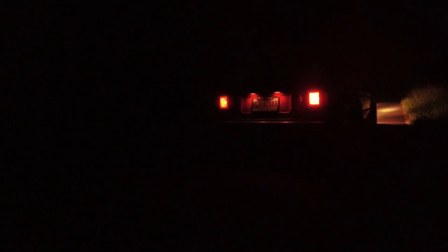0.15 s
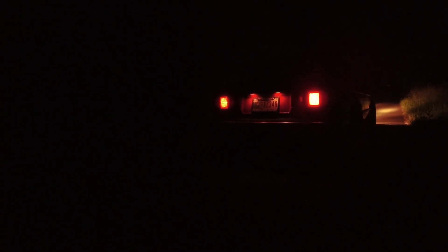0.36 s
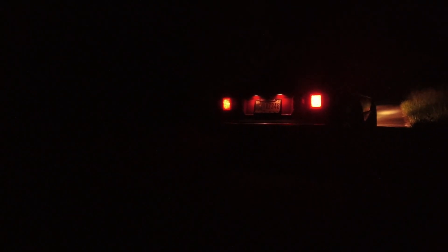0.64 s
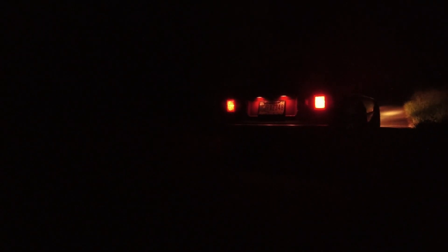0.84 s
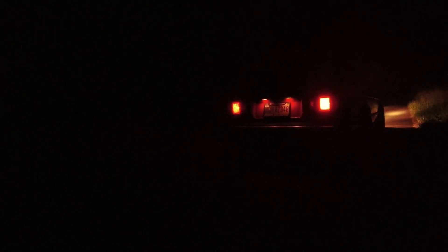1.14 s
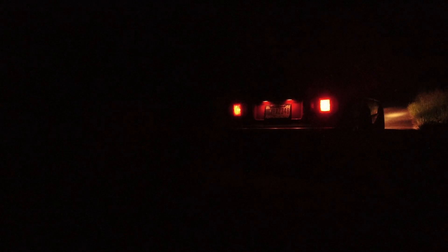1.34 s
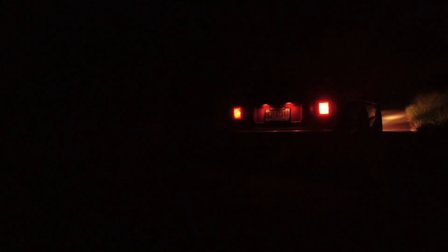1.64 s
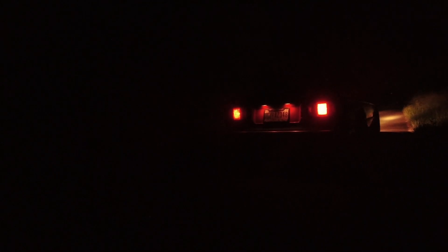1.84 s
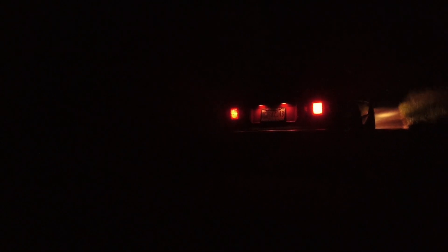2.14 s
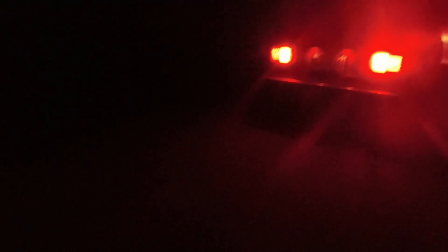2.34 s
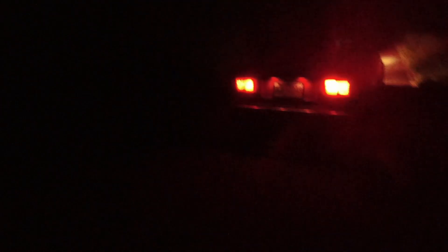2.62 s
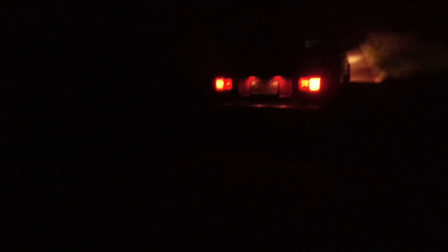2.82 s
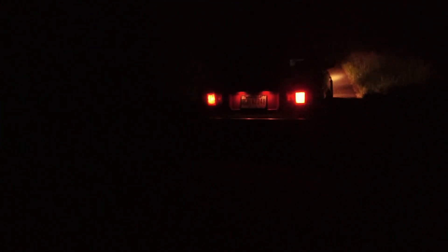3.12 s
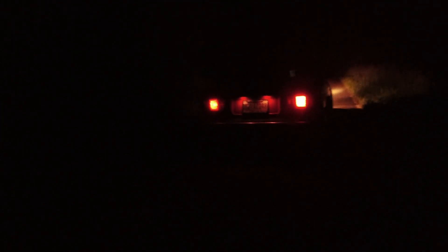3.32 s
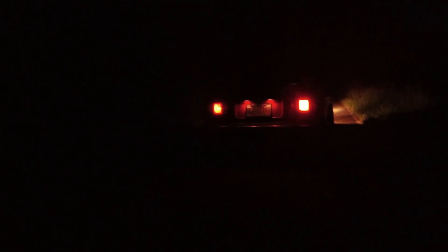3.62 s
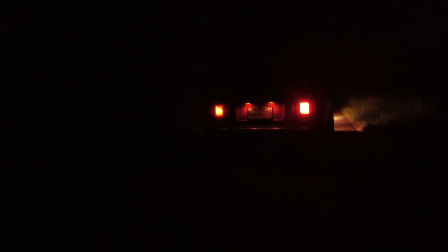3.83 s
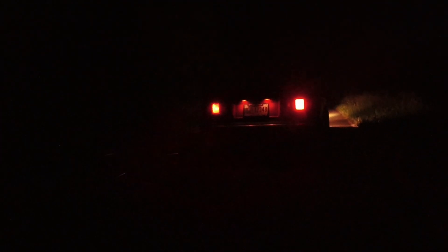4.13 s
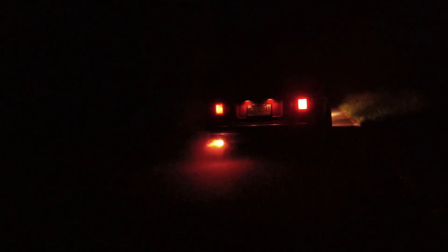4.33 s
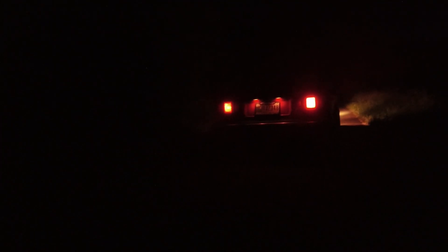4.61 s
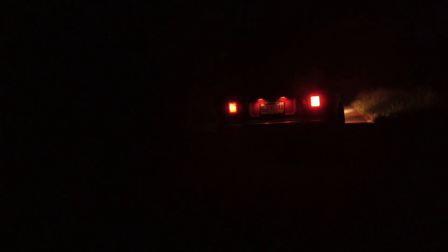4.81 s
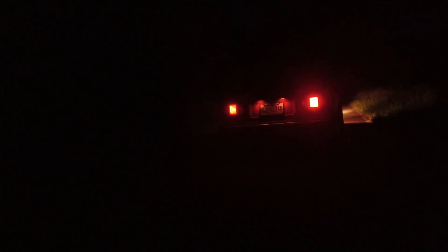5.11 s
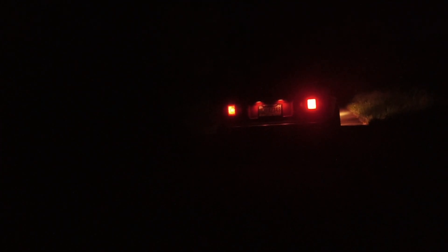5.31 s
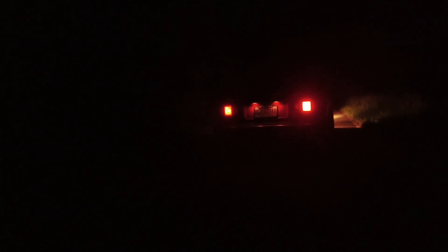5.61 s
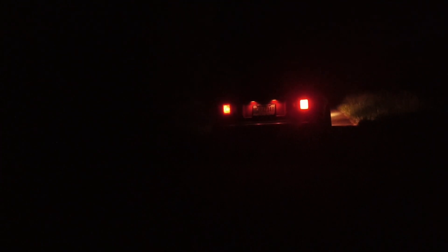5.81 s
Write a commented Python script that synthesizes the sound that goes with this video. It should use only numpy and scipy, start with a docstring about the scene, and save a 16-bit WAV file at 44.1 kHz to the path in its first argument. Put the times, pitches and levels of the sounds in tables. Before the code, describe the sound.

A turbocharged four-cylinder car is heard from close behind on a quiet night road. It begins at full throttle and hits its limiter at about 0.13 s: the steady note breaks into hissing gas, irregular hollow thuds, dry snaps and soft flame whumps, strongest around 0.65, 0.8 and 0.95 s. A breathy high turbo whistle creeps in. At 1.55 s the engine catches, a faint two-note chirp escapes, and the raspy drone falls with the whistle. At 2.34 s the sound cuts abruptly to a low, lumpy, much quieter idle. From 3.07 s the throttle opens and revs sweep up, growling, to the limiter at 3.9 s. Choppy pops and cracks follow, then from 4.5 to 5.3 s a dense, swelling machine-gun barrage of roaring bangs. A clearer chirp at 5.35 s releases boost; revs and whistle slide down until 5.96 s. Bass-heavy stereo microphones flatten the peaks; faint roadside reflections.

```python
"""Turbocharged car on its launch limiter

A four-cylinder car stands on a quiet road at night and is twice held against its limiter. Firing pulses excite
the exhaust resonances as boom, rasp and hiss; with the spark cut, lone firings thud and unburnt fuel explodes,
snaps and flares. Between the bouts the engine coasts, idles and revs up; a gliding tone is the turbo's whistle,
and two-note chirps are escaping boost. The microphones behind the car flatten the loudest peaks."""
import sys
import numpy as np
from scipy import signal
from scipy.fft import rfft, irfft, next_fast_len
from scipy.io import wavfile
from scipy.ndimage import uniform_filter1d

SR = 44100
rng = np.random.default_rng(int(sys.argv[2]) if len(sys.argv) > 2 else 0)


def transcribe(signal):
    """Save signal, clipped to [-1, 1], as a 16-bit WAV file at the path in sys.argv[1]."""
    frames = np.atleast_2d(signal).T
    limited = np.clip(frames, -1, 1)
    pcm = np.round(limited * 32767).astype(np.int16)
    wavfile.write(sys.argv[1], SR, pcm)


N = 262684
TIME = np.arange(N) / SR
FFT_SIZE = next_fast_len(N + SR // 2, True)
FREQ = np.fft.rfftfreq(FFT_SIZE, 1 / SR) + 1e-3  # kept above zero for the logarithms
TOP_HZ = 16000  # upper limit of the sound
LIMIT_HZ = 198.84  # firing rate at which the limiter cuts the spark

# Engine speed; the sound cuts abruptly from coasting to idle at 2.34 s: [t/s, firing rate f/Hz]
SPEED = [(0, 166), (.09, 188), (.125, 196), (1.53, 200), (1.6, 211), (1.7, 206), (2.335, 156),
         (2.342, 36.07), (3.05, 37.34), (3.165, 45), (3.385, 64.3), (3.468, 81.6), (3.58, 106.2),
         (3.794, 166.5), (3.9, 196), (4.48, 200), (5.41, 208), (5.96, 164)]
# Strength of each cylinder in firing order, before the inequality factor: [level/dB]
CYLINDER_DB = [2.5, -0.5, -1, 0.5]
# Spectrum of the silencer's boom: [f/Hz, level/dB per Hz]
BOOM = [(25, -16), (50, -6.5), (80, 8), (125, 14.5), (170, 10.5), (215, 2.5), (270, -7), (450, -49)]
# Spectrum of the rasp while the revs climb: [f/Hz, level/dB per Hz]
RASP_LOADED = [(280, -11), (375, 3.5), (460, -8), (560, 3), (700, -14), (850, -4), (1050, -14.5),
               (1250, -25), (1750, -12.5), (2000, -19), (2270, -13.5), (2700, -44), (3600, -28.5)]
# Spectrum of the rasp otherwise: [f/Hz, level/dB per Hz]
RASP_COASTING = [(265, 8), (400, 1.5), (480, 5), (560, 1.5), (680, 3.5), (770, -7), (870, -0.5),
                 (1100, -15.5), (1280, -17), (1450, -16), (1720, -28.5), (2050, -16.5), (2500, -46.5)]
# Spectrum of the hissing exhaust gas: [f/Hz, level/dB per Hz]
GAS = [(2200, -1.5), (3200, -6), (4100, 0), (5000, -7), (6000, -3), (8000, -6.5), (10300, -9),
       (12500, -15.5), (16000, -13)]


def engine(pulse_top_hz=600, idle_top_hz=380, jitter_s=.0001, uneven_db=2.4, hiss_flutter=0.3,
           idle_hz=125, idle_width_hz=45, load_flutter=.7, turbulence=3.23):
    """Pulse excitation: each firing booms through the silencer, rasps in the pipe and puffs out gas."""
    hz, = curves(SPEED)
    boom_db, rasp_db, hiss_db, inequality, roughness = effort(hz)
    cycles = np.cumsum(hz) / SR
    k = np.arange(int(cycles[-1]) + 1)
    chance = rng.standard_normal((len(k), 2)) * np.interp(k, cycles, roughness)[:, None]
    times = np.interp(k, cycles, TIME) + jitter_s * chance[:, 0]
    lumpy = np.interp(times, TIME, inequality)
    sizes = undb(lumpy * np.resize(CYLINDER_DB, len(k)) + uneven_db * chance[:, 1])
    # faster firings are smaller
    train = pulses(times, sizes / np.sqrt(np.interp(times, TIME, hz)))

    boom = filtered(train, colour(BOOM))
    # with little gas flowing, the silencer rings on from one firing to the next
    idling = np.interp(hz, [40, 65], [1, 0])
    ring = filtered(boom, 1 / (1 + 1j * (FREQ ** 2 - idle_hz ** 2) / (FREQ * idle_width_hz)))
    boom = steady(idling * ring + (1 - idling) * boom)

    # the throttle is open while the revs climb
    climbing = np.gradient(hz) * SR > 20
    load = np.clip(uniform_filter1d(climbing, SR // 20, output=float), 0, 1)
    # the rasp is pulse, repeating clatter and turbulence; load brings out the pulse
    puff = np.exp(-(cycles % 1) / .5) * sizes[cycles.astype(int)] ** 2
    pulse = in_pipe(filtered(train, lowpass(pulse_top_hz)))
    rattle = in_pipe(np.sqrt(puff) * clatter(cycles))
    pulse_share = .25 + .5 * load
    rough = 2 * (pulse_share * pulse + (1 - pulse_share) * rattle)
    rough = rough + turbulence * roughness * in_pipe(puff * noise())
    rasp = load * filtered(rough, colour(RASP_LOADED)) + (1 - load) * filtered(rough, colour(RASP_COASTING))
    # slow gas makes a duller rasp
    slow = np.interp(hz, [40, 130], [.8, 0])
    rasp = steady((1 - slow) * rasp + slow * filtered(rasp, np.abs(lowpass(idle_top_hz))))

    flow = 1 + (hiss_flutter + load_flutter * load) * puff
    hiss = steady(filtered(flow * noise(), colour(GAS)))
    # misfiring makes the gas crackle
    hiss = hiss * undb(2 * roughness * (waver(hz=250) - .25))
    return undb(boom_db) * boom + undb(rasp_db) * rasp + undb(hiss_db) * hiss + growl(hz, load, puff)


# How the engine sounds in each state, levels at the limiter's speed: state: [boom level/dB, rasp level/dB,
# hiss level/dB, rasp slope/dB per octave of speed, hiss slope/dB per octave, cylinder inequality factor]
STATES = { "full throttle": (-3.5, -9, -37, 14.5, 6, 0.7),
          "first misfires": (-9.5, -9.5, -39.5, 11.5, 3, 2.9),
          "limiter bites": (-23, -21.5, -34.5, 16.5, -5, 2), "spark cut": (-18, -21.5, -26.5, 17, 3.5, 2),
          "catching": (-4, -9, -26.5, 15.5, 7, 0.2), "barrage": (-18.5, -10, -24.5, 22, 9.5, 1.3),
          "hot barrage": (-16.5, -9, -17.5, 15.5, -3.5, 2), "throttle shut": (-22, -22, -33.5, 17, 23, 2),
          "coasting": (-10.5, -18.5, -34.5, 13, 29, 1.19), "idle": (-16.5, -19, -44, 15.5, 20, 1),
          "throttle cracks open": (-12, 0.5, -35.5, 18, 7, 2),
          "light throttle": (-10, -13, -49, 15, 4.5, 2.1), }
# What the driver and the limiter do: [from t/s, state]
DRIVE = [(0, "full throttle"), (0.126, "limiter bites"), (.19, "spark cut"), (1.546, "catching"),
         (1.597, "throttle shut"), (1.626, "coasting"), (2.336, "idle"), (3.07, "throttle cracks open"),
         (3.1, "light throttle"), (3.345, "throttle shut"), (3.379, "full throttle"),
         (3.906, "first misfires"), (3.942, "limiter bites"), (3.973, "spark cut"), (4.499, "barrage"),
         (4.912, "hot barrage"), (5.375, "throttle shut"), (5.405, "coasting")]
CLEAN_STATES = ("full throttle", "coasting", "light throttle")
CLEAN_ROUGHNESS = .35  # share of the roughness left in the clean-sounding states
BOOM_DB_PER_OCTAVE = 4.5  # growth with engine speed
CHANGE_S = 0.016  # one state blends into the next


def effort(hz):
    """Power law of speed: the state sets boom, rasp and hiss in dB, inequality and roughness."""
    starts = [s for s, _ in DRIVE]
    now = np.maximum(np.searchsorted(starts, TIME, side="right") - 1, 0)
    settings = np.array([STATES[state] for _, state in DRIVE])
    boom, rasp, hiss, rasp_slope, hiss_slope, lumpy = settings[now].T
    roughness = np.array([CLEAN_ROUGHNESS if state in CLEAN_STATES else 1 for _, state in DRIVE])[now]
    octaves = np.log2(hz / LIMIT_HZ)
    boom = boom + BOOM_DB_PER_OCTAVE * octaves
    rasp = rasp + rasp_slope * octaves
    hiss = hiss + hiss_slope * octaves
    controls = np.array([boom, rasp, hiss, lumpy, roughness])
    return uniform_filter1d(controls, int(CHANGE_S * SR) + 1)


def in_pipe(x):
    """Low-pass transmission: the pipe dulls a sound above 2 kHz, here held at unit level."""
    return steady(filtered(x, lowpass(2000)))


def clatter(cycles):
    """Periodicity: a random-phase pattern of gas flow that comes round again every four firings."""
    orders = np.exp(2j * np.pi * rng.random(200))
    pattern = irfft(np.append(0, orders), 8192)
    places = np.arange(len(pattern)) / len(pattern)
    return steady(np.interp(cycles / len(CYLINDER_DB), places, pattern, period=1))


# Upper resonances of the pipe that growl under load: [f/Hz, width f/Hz, level/dB]
GROWL = [(1770, 260, -5), (2210, 130, 1)]
GROWL_DB, GROWL_DB_PER_OCTAVE = -23.5, 18  # at the limiter's speed; growth with speed


def growl(hz, load, puff):
    """Resonance under modulated noise: gas under load rings the upper modes in time with the firings."""
    ring = steady(filtered(puff ** 2 * noise(), resonances(GROWL) * lowpass(2400) ** 2))
    level = undb(GROWL_DB + GROWL_DB_PER_OCTAVE * np.log2(hz / LIMIT_HZ))
    return load * level * np.interp(hz, [60, 72], [0, 1]) * ring


# Exhaust pipe resonances: [f/Hz, width f/Hz, level/dB]
PIPE = [(85.7, 27, -1), (145.4, 58.3, 5.5), (246.7, 22, -3.5), (497, 130, -8), (649.4, 50, -6.5),
        (854, 160, -28.5), (1240, 77, -14.5), (2060, 76, -34.5), (2820, 260, -31.5)]
# The loudest explosions of fuel in the pipe, relative levels: [t/s, thud level/dB, roar level/dB]
EXPLOSIONS = [(.677, 4.5, 7.5), (.749, 9.5, 11.5), (.786, 15.5, 3), (3.971, 2, 12), (4.075, -0.5, 14.5),
              (4.502, 1, -2.5), (4.55, 7.5, 4.5), (4.595, 7.5, -0.5), (4.613, 7, -8), (4.665, 5, -5.5),
              (4.678, 3, -3.5), (4.715, 9, 1.5), (4.749, 6, 2.5), (4.801, 8, -1), (4.837, 6, 4.5),
              (4.872, 3, -3), (4.917, 7.5, 11), (4.946, 5, -7), (4.975, 4, 1.5), (5.038, 5.5, -2),
              (5.063, 3, 6), (5.111, 3.5, -1.5), (5.144, 3, -7), (5.181, 8, 6), (5.203, 9.5, 0),
              (5.265, 9.5, -5), (5.283, 6, -7.5), (5.32, 3, -3.5)]
# Spectrum of the burning fuel's roar: [f/Hz, level/dB per Hz]
ROAR = [(70, -6.5), (150, 9), (330, -4.5), (500, 5.5), (700, -4.5), (850, -3), (1400, -16), (2100, -10),
        (3000, -20), (4400, -23), (8000, -35.5), (16000, -39.5)]


def bangs(thud_db=6, roar_db=-1, bark_db=-11, roar_s=0.011, heave_hz=135, heave_width_hz=45, heave_db=3,
          bark_s=0.0077, bark_top_hz=3600, blast_front_hz=1500):
    """Impulse response: firings and explosions ring the pipe; a firing barks briefly, an explosion roars."""
    explosions = list(EXPLOSIONS) + barrage()
    firings, blasts = blows(stutters()), blows(explosions)
    # an explosion pushes for longer than a firing does
    blasts = filtered(blasts, lowpass(blast_front_hz))
    thuds = undb(thud_db) * filtered(firings + blasts, resonances(PIPE))
    # an explosion also heaves the whole column of gas
    thuds = thuds + undb(heave_db) * filtered(blasts, resonances([(heave_hz, heave_width_hz, 0)]))
    # the pressure front is rounded on its way down the pipe
    thuds = signal.sosfilt(signal.butter(4, 3000, fs=SR, output="sos"), thuds)

    # fuel burns in ragged pockets
    pockets = undb(3.5 * waver(hz=220))
    burn = pockets * filtered(noise(apart_hz=3400), colour(ROAR))
    roars = dying(blows([(s, db) for s, _, db in explosions]), roar_s) * ragged(burn)
    barks = filtered(dying(firings, bark_s) * burn, lowpass(bark_top_hz))
    return thuds + undb(roar_db) * roars + undb(bark_db) * barks


# Which firings catch in a stutter, counted from its first: pattern: [firing number]
PATTERNS = {"one": [0], "quick two": [0, 3], "slow two": [0, 7], "quick-slow": [0, 3, 7], "slow-quick": [0,
            7, 10]}
# Stutters of firings that the limiter lets through, relative levels: [t/s, level/dB, pattern]
STUTTER_ROWS = [(0.1339, -0.5, "one"), (.171, 7.5, "one"), (.242, 2.5, "quick two"), (0.293, 8, "one"),
                (.381, 4, "slow-quick"), (.504, 6.5, "quick-slow"), (.627, 6.5, "one"),
                (.712, 8.5, "quick two"), (0.835, 3.5, "quick two"), (0.885, 12.5, "one"),
                (1.009, 9, "quick-slow"), (1.095, 8, "slow-quick"), (1.217, 6, "quick-slow"),
                (1.3136, 10.5, "slow two"), (1.399, 6.5, "slow two"), (1.486, 7, "slow-quick"),
                (3.916, -2.5, "one"), (3.934, 2.5, "one"), (4.004, -2.5, "quick two"), (4.059, 4, "one"),
                (4.13, 0.5, "quick two"), (4.18, 13, "one"), (4.267, 10.5, "slow two"),
                (4.389, 7, "quick two"), (4.441, -2, "slow two"), (4.486, -0.5, "one")]


def stutters():
    """Intermittent excitation: rows (s, dB) of the firings that the limiter lets through."""
    return [(s + slot / LIMIT_HZ, db) for s, db, pattern in STUTTER_ROWS for slot in PATTERNS[pattern]]


BARRAGE_S = (4.51, 5.335)  # with the pipe hot, lesser bangs run together from, to
BARRAGE_GAP = (3, 7)  # fewest and most firings from one bang to the next
# relative level of the thuds at the start, their growth and spread; roar relative to thud
BARRAGE_DB, BARRAGE_SWELL_DB_PER_S, BARRAGE_SCATTER_DB, BARRAGE_ROAR_DB = -0.5, 4, 1.5, -12


def barrage():
    """Random point process: rows (s, thud dB, roar dB) of bangs growing as the pipe heats."""
    start, end = BARRAGE_S
    gaps = rng.integers(BARRAGE_GAP[0], BARRAGE_GAP[1] + 1, size=100)
    age = np.cumsum(gaps) / LIMIT_HZ
    spread = BARRAGE_SCATTER_DB * rng.standard_normal(len(age))
    thud_db = BARRAGE_DB + BARRAGE_SWELL_DB_PER_S * age + spread
    return [(start + a, db, db + BARRAGE_ROAR_DB) for a, db in zip(age, thud_db) if start + a < end]


# Centres of the parts of the roar that swell on their own: [f/Hz]
ROAR_BANDS_HZ = [480, 850, 1400, 2250, 4300]


def ragged(x, spread_db=4, rate_hz=35):
    """Independent band modulation: each band swells and fades alone, so bursts differ in colour."""
    bands = (filtered(x, 1 / (1 + 2j * (FREQ / hz - hz / FREQ))) for hz in ROAR_BANDS_HZ)
    return x + sum((undb(spread_db * waver(hz=rate_hz)) - 1) * band for band in bands)


# Short bright flashes at the tailpipe, relative levels: [t/s, level/dB, length t/s]
FLARES = [(.181, -15, 0.015), (3.971, -4, 0.012), (4.074, -12, 0.011)]
# Spectrum of a jet of flame: [f/Hz, level/dB per Hz]
FLAME = [(500, 0.5), (1500, -3), (3000, -3.5), (4500, -1.5), (7000, -8.5), (10000, -7), (16000, -15.5)]
# Backfires, relative levels: [snap t/s, snap level/dB, whump level/dB, flame level/dB]
BACKFIRES = [(0.186, -12, -10.5, -31), (0.3082, -10, -4, -27), (0.4316, -13.5, 0.5, -25.5),
             (0.5552, -5.5, -6, -17), (0.6268, -9, 5, -6.5), (.921, -1.5, 8, -6), (4.196, -8.5, -11, -23.5),
             (4.318, -11.5, -4, -22.5), (4.441, -19, -7.5, -30)]
IGNITION_S, JET_S = .0285, 0.036  # from snap to whump; length setting of the jet


def flames(whump_hz=38, whump_width_hz=55, soft_hz=260, snap_hz=2000, snap_width_hz=3200,
           whump_db=1, snap_db=11.0):
    """Combustion noise: fuel lights at the tailpipe with a dry snap, a pressure whump and a hissing jet."""
    jets = list(FLARES) + [(s + IGNITION_S, db, JET_S) for s, _, _, db in BACKFIRES]
    jet = sum(undb(db) * swell(s, length) for s, db, length in jets)
    pushes = blows([(s + IGNITION_S, db) for s, _, db, _ in BACKFIRES])
    heave = resonances([(whump_hz, whump_width_hz, 0)])
    whumps = filtered(pushes, heave / (1 + 1j * FREQ / soft_hz) ** 2)
    # a snap is over within a few milliseconds
    spark = dying(blows(BACKFIRES), .0016) * noise(apart_hz=3000)
    mouth = resonances([(snap_hz, snap_width_hz, 0)])
    snaps = filtered(spark, mouth / np.abs(mouth).max())
    return jet * filtered(noise(), colour(FLAME)) + undb(whump_db) * whumps + undb(snap_db) * snaps


def hush(depth_db=-4):
    """Gain modulation: the engine's level dips between each snap and its whump."""
    stalled = sum((TIME > s) * (TIME < s + IGNITION_S) for s, *_ in BACKFIRES)
    return undb(depth_db * uniform_filter1d(1. * stalled, size=SR // 100))


# Boost escaping as the throttle shuts, relative levels:
# [t/s, lower note f/Hz at the start, upper note f/Hz at the start, level/dB, length t/s]
CHIRPS = [(1.553, 646, 835, -16.5, 0.035), (5.346, 1396, 2120, -9, .022), (5.419, 1138, 1570, -22, .04)]


def chirps(upper_db=-3, sag_per_s=.8):
    """Flow-excited tones: the blow-off valve squeals two notes, sagging as the pressure drops."""
    out = 0
    for s, lower, upper, db, length in CHIRPS:
        sag = np.exp(-sag_per_s * np.maximum(TIME - s, 0))
        turns = 2 * np.pi * np.cumsum(sag * (1 + .035 * waver(hz=300))) / SR
        notes = np.sin(lower * turns) + undb(upper_db) * np.sin(upper * turns)
        out = out + undb(db) * swell(s, length) * notes
    return out


# The turbo's whistle, one curve each for the first bout, idle and the second bout: [t/s, f/Hz, level/dB]
TURBO = [
    [(.6, 9000, -61), (.85, 9750, -38.5), (1.1, 9620, -38.5), (1.5, 9170, -38), (1.68, 9300, -41),
     (1.9, 8000, -42), (2.12, 7050, -36.5), (2.335, 6500, -52)],
    [(2.34, 1215, -55), (2.65, 1213, -62), (3.05, 1250, -51.5), (3.12, 1380, -68), (3.2, 1620, -62.5),
     (3.3, 2000, -63), (3.38, 2050, -62)],
    [(4.8, 10260, -51.5), (5.35, 11300, -41), (5.52, 10550, -40.5), (5.75, 9000, -43.5),
     (5.96, 7750, -43.5)],
]


def turbo(flutter_db=5.5, throb_db=3.5, octave_db=-22):
    """Rotor tone: the compressor wheel whistles, throbbing with the exhaust pulses that drive it."""
    hz, db = curves([row for whistle in TURBO for row in whistle])
    heard = sum((TIME >= whistle[0][0]) * (TIME < whistle[-1][0]) for whistle in TURBO)
    fade = uniform_filter1d(np.minimum(heard, 1.), size=SR // 100)
    # one throb per turn of the crank, which is two firings
    throb = np.sin(np.pi * np.cumsum(curves(SPEED)[0]) / SR)
    # the faster the wheel, the breathier its note
    speed = hz / hz.max()
    wander = .026 * np.maximum(speed, .25) ** 2
    phase = 2 * np.pi * np.cumsum(hz * (1 + wander * waver(hz=298))) / SR
    tone = np.sin(phase) + undb(octave_db) * (2 * hz < TOP_HZ) * np.sin(2 * phase)
    level = undb(db + throb_db * throb + flutter_db * speed * waver(hz=45))
    note = np.sqrt(2) * fade * level * tone
    # it reaches the back of the car partly by way of the road and the underbody
    return scatter(note, decay_s=.015, db=-3)


def roadside(car):
    """Diffuse reflection: the car's sound with faint returns from the roadside."""
    return scatter(car, decay_s=0.15, db=-24.5, apart_hz=200)


# Spectrum of the night air: [f/Hz, level/dB per Hz]
NIGHT = [(25, -68.5), (400, -95), (1200, -89.5), (16000, -124)]


def night_air():
    """Stationary noise: the still night air as a faint coloured hush."""
    return undb(-57.5) * filtered(noise(), colour(NIGHT))


def undb(db):
    """Level law: decibels to amplitude gain."""
    return 10 ** (np.asarray(db) / 20)


def curves(rows):
    """Linear interpolation: each column of a table, joined by straight lines in time."""
    s, *columns = np.transpose(sorted(map(tuple, rows)))
    return [np.interp(TIME, s, c) for c in columns]


def filtered(x, response):
    """Convolution theorem: a spectrum multiplied by a frequency response."""
    return irfft(rfft(x, FFT_SIZE) * response, FFT_SIZE)[..., :N]


def colour(points):
    """Minimum phase: the causal response of (Hz, dB) points, with unit power gain."""
    hz, db = np.transpose(points)
    # roll off outside the points
    below = np.clip(FREQ / hz[0], 1e-2, 1) ** 2
    above = np.minimum(hz[-1] / FREQ, 1) ** 4
    gain = undb(np.interp(np.log(FREQ), np.log(hz), db)) * below * above
    cepstrum = irfft(np.log(gain / np.sqrt(np.mean(gain ** 2))))
    # folding the cepstrum onto positive times makes the response causal
    return np.exp(rfft(2 * cepstrum[:len(cepstrum) // 2], len(cepstrum)) - cepstrum[0])


def resonances(modes):
    """Modal superposition: (Hz, width, dB) modes, their joint impulse response peaking at one."""
    response = sum(undb(db) / (1 + 1j * (FREQ ** 2 - hz ** 2) / (FREQ * width)) for hz, width, db in modes)
    return response / np.abs(irfft(response)).max()


def lowpass(hz):
    """Second-order roll-off: a response that falls 12 dB an octave above hz."""
    return 1 / (1 + 1j * np.sqrt(2) * FREQ / hz - (FREQ / hz) ** 2)


def noise(apart_hz=3500):
    """Spatial coherence: noise at two microphones, alike in the bass and unrelated in the treble."""
    mid, side = rng.standard_normal((2, N))
    side = filtered(side, FREQ / (FREQ + apart_hz))
    return np.array([mid + side, mid - side])


def pulses(times, sizes):
    """Fractional delay: one impulse at each time, shared between two samples."""
    whole, part = np.divmod(np.clip(times * SR, 0, N), 1)
    whole = whole.astype(int)
    early = np.bincount(whole, sizes * (1 - part), N + 2)
    late = np.bincount(whole + 1, sizes * part, N + 2)
    return early[:N] + late[:N]


def blows(rows):
    """Impulsive excitation: impulses from rows that begin (s, dB), each a hair early or late."""
    s, db = np.transpose(rows)[:2]
    return pulses(s + rng.uniform(-.0005, .0005, len(s)), undb(db))


def dying(x, decay_s):
    """Exponential decay: each impulse becomes a level that dies away."""
    return signal.lfilter([1], [1, -np.exp(-1 / (decay_s * SR))], x)


def swell(start, length):
    """Transient envelope: rises from start and is gone in about twice its length."""
    age = np.maximum(TIME - start, 0) / length
    return 2 * age * np.exp(-age ** 2)


def steady(x):
    """Level normalisation: sound held at unit level over a few firings."""
    size = SR // 18
    power = np.mean(np.atleast_2d(x) ** 2, axis=0)
    smooth = uniform_filter1d(uniform_filter1d(power, size), size)
    return x / np.sqrt(np.abs(smooth) + 1e-14)


def waver(hz):
    """Band-limited fluctuation: a random wobble of unit spread, mostly slower than hz."""
    return steady(filtered(rng.standard_normal(N), 1 / (1 + 1j * FREQ / hz) ** 2))


def scatter(x, decay_s, db, apart_hz=2500):
    """Reverberation: a dying cloud of reflections, a little different at each microphone."""
    tail = noise(apart_hz) * np.exp(-TIME / decay_s) * np.sqrt(2 / (decay_s * SR))
    return x + undb(db) * signal.fftconvolve(np.atleast_2d(x), tail, axes=1)[:, :N]


def scene():
    """Superposition: the car, its roadside returns and the night air add."""
    car = hush() * engine() + bangs() + flames() + chirps() + turbo()
    return roadside(car) + night_air()


def flatten(x, top, knee=8):
    """Saturation: peaks are squeezed smoothly under a ceiling."""
    return x / (1 + np.abs(x / top) ** knee) ** (1 / knee)


def unity_in_bass(response):
    """Reference gain: a response scaled to one at 150 Hz."""
    return response / np.interp(150, FREQ, np.abs(response))


# The microphones favour the bass: [f/Hz, level/dB]
BASS_TILT = [(12, 11), (2200, 1.5), (20000, -3.5)]
# Treble colour of the microphones' housing: [f/Hz, level/dB]
MICROPHONE = [(5, 5), (2200, -4), (3200, -7.5), (4400, -7.5), (8000, -18), (10300, -10.5), (16000, -12)]


def record(dry, ceiling=.71, port_lag_s=.000008, split_hz=3000, treble_ceiling_db=-12):
    """Overload in two bands: two microphones a little apart flatten loud peaks; the housing colours them."""
    heard = filtered(dry, unity_in_bass(colour(BASS_TILT)))
    below = 1 / (1 + (FREQ / split_hz) ** 4)
    body = filtered(heard, below)
    treble = heard - body
    # the second pass keeps most of the bass overload's harmonics out of the treble
    flat = filtered(flatten(body, ceiling), below) + flatten(treble, undb(treble_ceiling_db))
    ports = np.exp(-2j * np.pi * FREQ * np.array([[port_lag_s], [0]]))
    out = filtered(flat, ports * unity_in_bass(colour(MICROPHONE)))
    # the top is cut
    return signal.sosfilt(signal.ellip(8, .2, 70, TOP_HZ, fs=SR, output="sos"), out)


dry = scene()
out = record(dry)
transcribe(out)
```